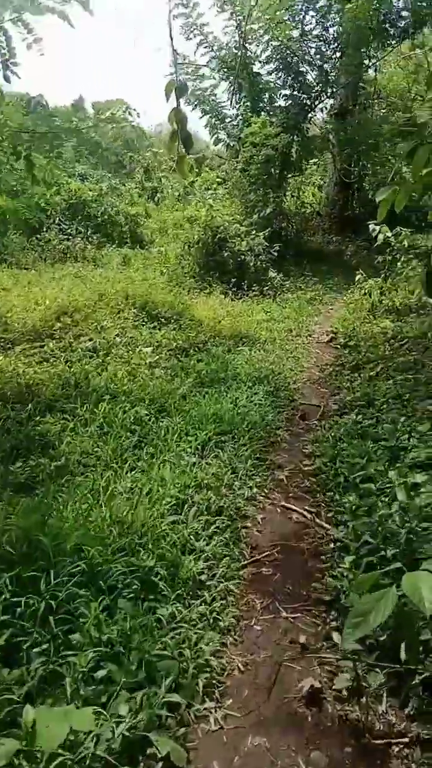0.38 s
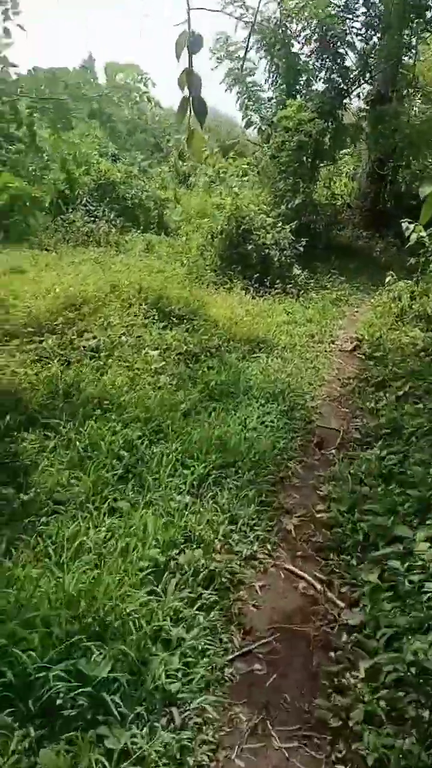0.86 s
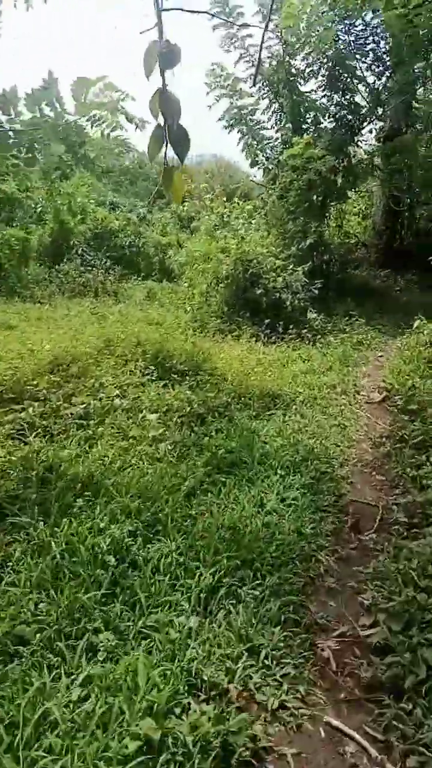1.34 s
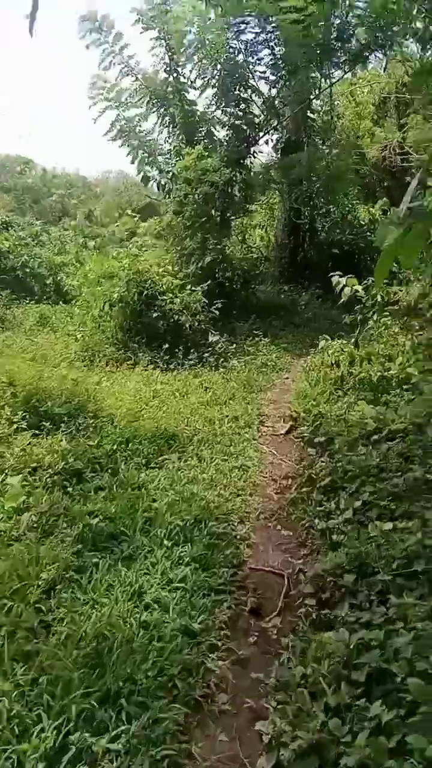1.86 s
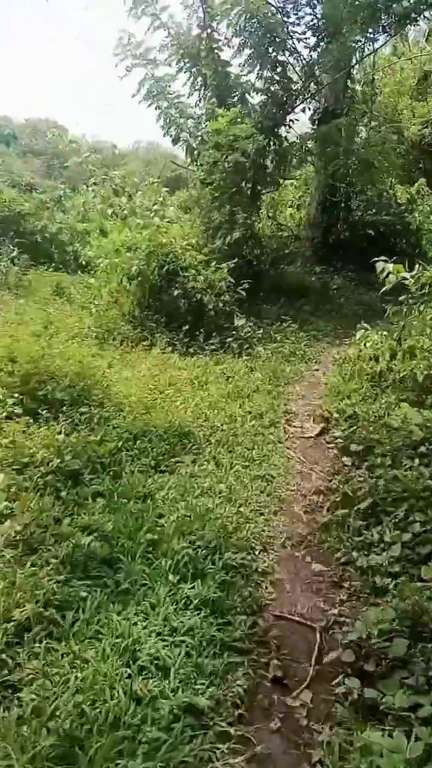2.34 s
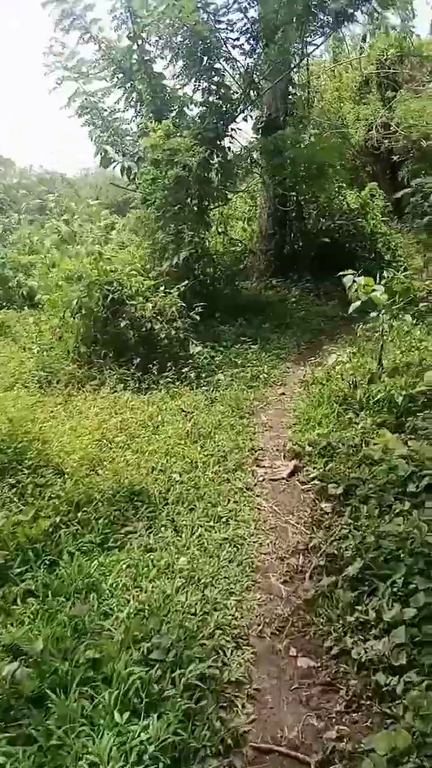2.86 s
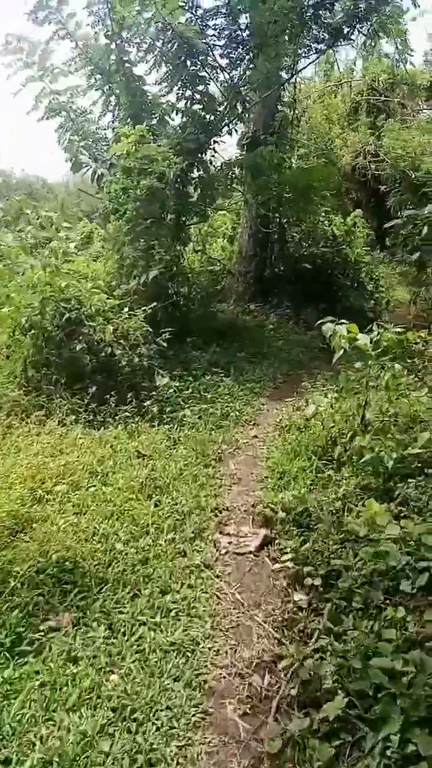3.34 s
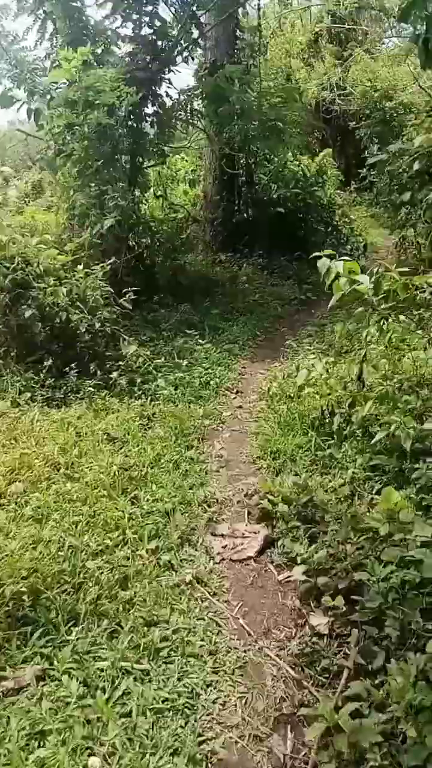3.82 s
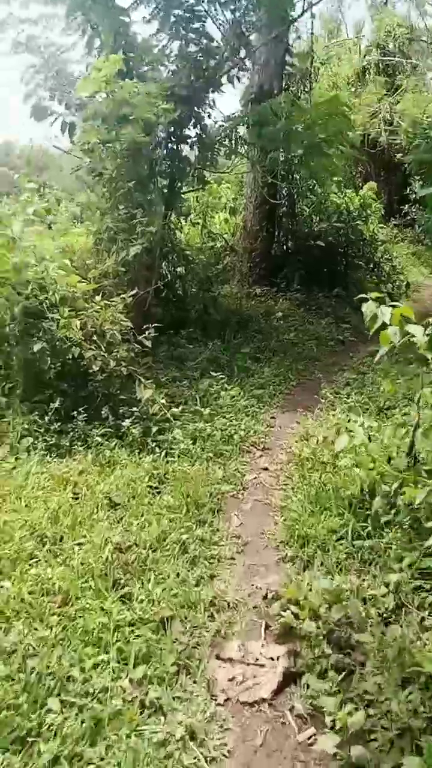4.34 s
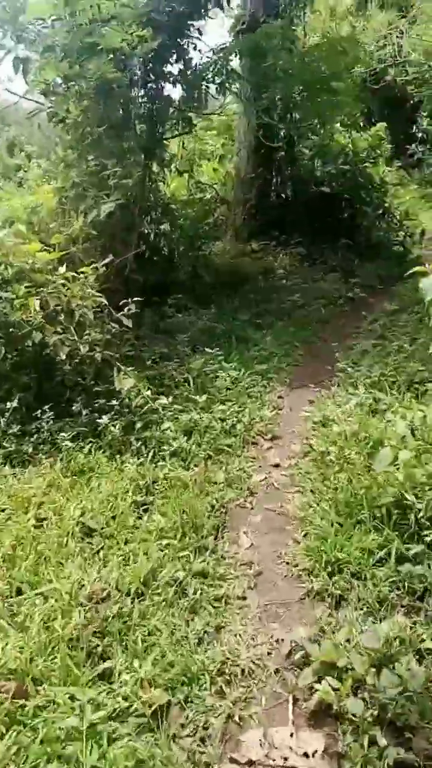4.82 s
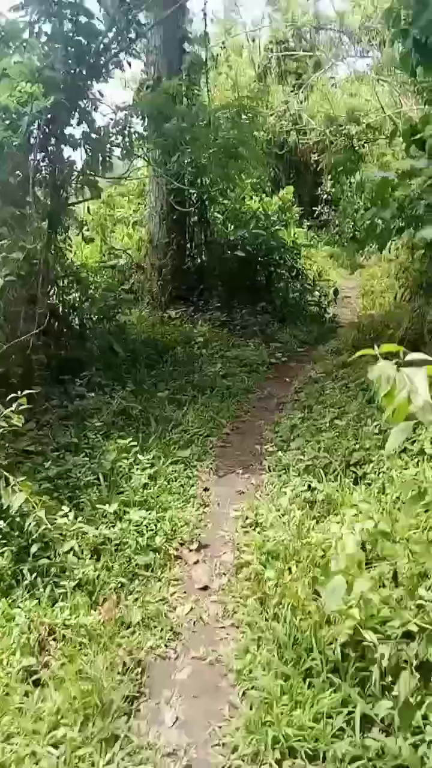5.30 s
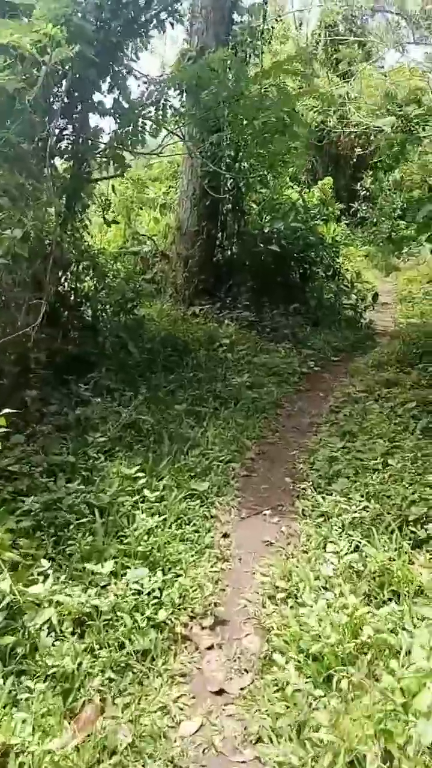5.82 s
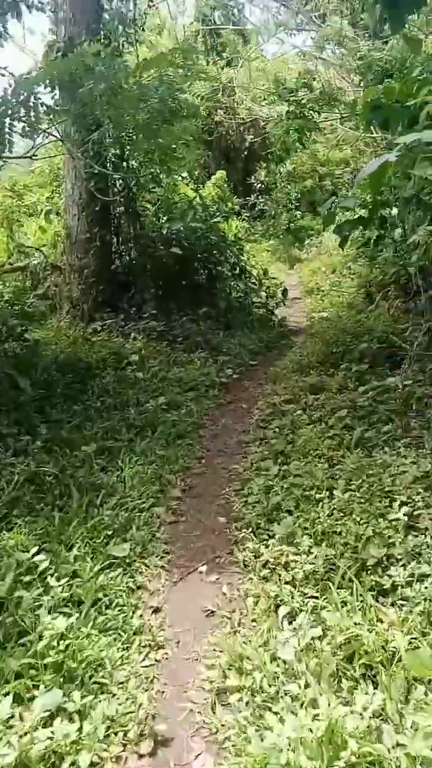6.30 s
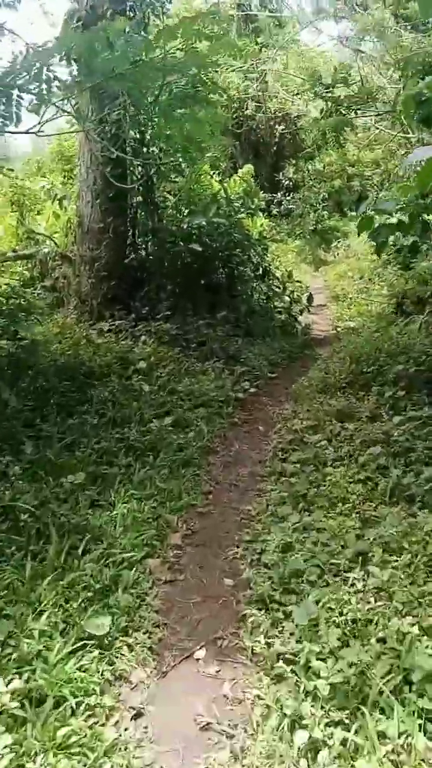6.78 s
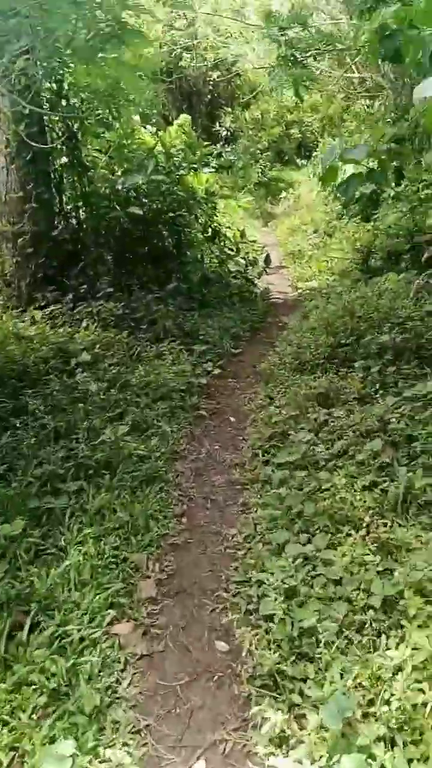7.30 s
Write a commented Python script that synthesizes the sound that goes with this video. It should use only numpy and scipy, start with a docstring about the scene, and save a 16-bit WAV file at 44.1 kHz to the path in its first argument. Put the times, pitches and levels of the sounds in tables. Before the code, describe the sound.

Outdoors on a path under trees, a steady high insect buzz runs throughout. A far bird's trill fades at the start, then clear whistles echo through the wood. Grass swishes with strides and twigs snap softly. Wind thumps the handheld microphone. Around two and a half seconds the wide stereo abruptly narrows to mono; later a nearer bird sings faster, brighter phrases.

```python
"""A steady insect band under trees, with a far trill washing through it: noise in a band and falling sine sweeps.
Along a dirt path, far birds and one near songbird whistle as gliding sines into the echo of the wood.
Grains of noise are legs in the grass, ringing clicks are twigs; wind thumps the microphone as bass noise and
short low swings. At one moment the stereo picture folds to mono and the echoes of before are cut off."""
import sys
import numpy as np
from scipy import signal
from scipy.fft import rfft, irfft
from scipy.io import wavfile
from scipy.ndimage import uniform_filter1d, map_coordinates

SR = 44100
rng = np.random.default_rng(int(sys.argv[2]) if len(sys.argv) > 2 else 0)


def wav_out(sig):
    """Save sig, one row per channel (or a flat mono array), as 16-bit PCM at SR to the path in sys.argv[1]."""
    wavfile.write(sys.argv[1], SR, np.round(np.clip(np.atleast_2d(sig).T, -1, 1) * 32767).astype(np.int16))


def field_ratio(decibels):
    """Amplitude ratio for a level in dB (20 dB per decade); scalars and array-likes work."""
    return 10 ** (np.asarray(decibels, dtype=float) / 20)


N = 337806
FOLD_S = 2.578  # mono from here on
LEAD = SR // 2  # samples of birdsong ahead of the start, so that echoes are already ringing


def unit(x):
    """Scaled to rms 1."""
    return x / np.sqrt(np.mean(x ** 2) + 1e-20)


def along(points, hz):
    """Interpolates (Hz, value) points on a log frequency axis."""
    f, v = np.transpose(points)
    return np.interp(np.log(hz + 1), np.log(f + 1), v)


def curves(rows):
    """One value per sample for each column after the time."""
    s, *cols = np.transpose(rows)
    return [np.interp(np.arange(N) / SR, s, c) for c in cols]


def wobble(rate):
    """A smooth random curve, rate knots a second."""
    coarse = map_coordinates(rng.standard_normal(SR // 8), [np.arange(0, N + 16, 16) * rate / SR])
    return np.interp(np.arange(N) / 16, np.arange(len(coarse)), coarse)


def stereo(mid, side, alike):
    """Left and right with mid rms 1; alike is the correlation between them."""
    side = side * np.tan(np.arccos(np.clip(alike, 0, 1)) / 2)
    return np.array([mid + side, mid - side]) / np.std(mid)


def rush(spectrum, alike, patchy_db):
    """Stereo noise with patches of random gain in time and frequency."""
    hz, _, z = signal.stft(rng.standard_normal((2, N + 1024)), SR, nperseg=1024)
    field = uniform_filter1d(rng.standard_normal(z.shape[1:]), size=9, axis=0)
    field = uniform_filter1d(field, size=5, axis=1)
    gain = field_ratio(along(spectrum, hz)[:, None] + patchy_db * unit(field))
    mid, side = signal.istft(z * gain, nperseg=1024)[1][:, :N]
    return stereo(mid, side, alike)


def low(spectrum, alike):
    """Stereo bass noise, shaped finely over the whole length."""
    hz = np.fft.rfftfreq(N, 1 / SR)
    mid, side = irfft(rfft(rng.standard_normal((2, N))) * field_ratio(along(spectrum, hz)), N)
    return stereo(mid, side, alike)


def width():
    """1 while the picture is wide, falling to 0 in the last moment before the fold."""
    return np.clip((FOLD_S - np.arange(N) / SR) / .02, 0, 1)


# Loudness of the insect chorus. Each row: time in seconds, level in dB.
CHORUS_LEVEL = [(0, -54.5), (3.7, -52.5), (7.66, -53.5)]
# Its band. Each row: frequency in Hz, relative density in dB per Hz.
CHORUS_SPECTRUM = [(4800, -58), (5900, -10.5), (6600, -1), (7600, -4), (9100, 1), (9900, -8.5),
                   (10800, -21), (12000, -32)]


def insects():
    """A chorus of many, blurred to a band with a fine fast shimmer."""
    level_db, = curves(CHORUS_LEVEL)
    shimmer_db = 0.41 * wobble(250)
    return field_ratio(level_db + shimmer_db) * rush(CHORUS_SPECTRUM, alike=1.0, patchy_db=2.0)


# Far leaves and open air, apart from the dip. Each row: time in seconds, level in dB.
AIR_LEVEL = [(0, -58.5), (2.57, -58.5), (3.05, -64), (5, -62.5), (7.66, -63.5)]
# Their hush. Each row: frequency in Hz, relative density in dB per Hz.
AIR_SPECTRUM = [(30, 4.5), (150, 6.5), (400, 2.5), (1000, -2.5), (3000, -4.5), (5000, -9.5), (11000, -22),
                (16000, -17.5)]


def air():
    """Far leaves and open air are a broad hush, whose level dips for a while after the fold."""
    t = np.arange(N) / SR
    dip_end_s, dip_db = 3.03, -16
    dip = np.clip(np.minimum(t - FOLD_S, dip_end_s - t) / 0.0093, 0, 1)
    return field_ratio(curves(AIR_LEVEL)[0] + dip_db * dip) * rush(AIR_SPECTRUM, alike=0.42, patchy_db=3.0)


# Gusts on the microphone ports. Each row: start of the hold in seconds, hold in seconds, thump level in dB.
GUST_TIMES = [(1.316, 0.067, -56.5), (1.49, 0.097, -44), (1.804, 0.011, -38.5), (1.896, 0.019, -42),
              (2.44, 0.15, -39), (2.606, 0.033, -39), (3.96, 0.15, -45.5), (4.348, 0.25, -45),
              (4.892, 0.41, -48), (6.215, 0.029, -36), (6.23, .1, -39.5), (6.411, 0.15, -43.5),
              (6.621, 0.071, -41.5), (7.445, 0.16, -55)]
# Breeze between gusts, about which the level wanders. Each row: time in seconds, thump level in dB.
BREEZE_LEVEL = [(0, -64.5), (1.3, -61), (2.3, -47.5), (3.2, -53), (3.4, -75.5), (4.2, -56.5), (5.2, -55),
                (5.7, -78.5), (7.66, -92)]


def gusts():
    """Thump level in dB: the breeze, and over it each gust's rise, hold and fall."""
    s, hold, db = np.transpose(GUST_TIMES)
    rise_db_per_s, fall_db_per_s = 600, 453
    t = np.arange(0, N / SR + .01, .002)[:, None]
    rise = rise_db_per_s * np.maximum(s - t, 0)
    fall = fall_db_per_s * np.maximum(t - s - hold, 0)
    gust_db = np.interp(np.arange(N) / SR, t[:, 0], (db - rise - fall).max(axis=1))
    breeze_db = curves(BREEZE_LEVEL)[0] + 6 * np.tanh(wobble(15))
    return np.maximum(gust_db, breeze_db)


# Lowest rumble at the microphone while the picture is wide. Each row: time in seconds, level in dB.
DEEP_LEVEL = [(0, -54), (2.33, -49), (2.38, -39.5), (2.48, -36), (2.55, -34)]
# Spectra of that rumble, of the thumps and of hard gusts.
# Each row: frequency in Hz, relative density in dB per Hz.
RUMBLE_SPECTRUM = [(10, -14), (32, -4.5), (55, -3.5), (90, -18.5), (200, -80)]
THUMP_SPECTRUM = [(30, -62), (70, 0.5), (130, 1.5), (220, -19), (400, -55), (800, -51)]
SLAP_SPECTRUM = [(120, 16), (260, 7), (600, -36)]


def wind():
    """Gusts on the ports: lumpy thumps, brighter when hard, over a deep rumble."""
    thump_db, wide = gusts(), width()
    lumps = unit(field_ratio(3.9 * wobble(24))) * field_ratio(-6.5 * wide)
    slap_db = 1.57 * thump_db + 17.0 + 0.83 * wide  # grows faster than the thump
    thumps = field_ratio(thump_db) * low(THUMP_SPECTRUM, alike=0.84) + field_ratio(slap_db) * low(SLAP_SPECTRUM, alike=0.57)
    # once mono, the rumble follows the gusts from 22 dB under them
    deep_db = wide * curves(DEEP_LEVEL)[0] + (1 - wide) * (thump_db - 22)
    rumble = unit(field_ratio(wobble(2.59)) * low(RUMBLE_SPECTRUM, alike=0.66))
    lean = field_ratio([[1.5], [-1.5]])  # towards the left
    return field_ratio(deep_db) * rumble * lean + lumps * thumps


def add(line, rows, flutter_db=2.5, waver_share=0.0083, edge_s=0.0012, knots_per_s=130):
    """One note: a slightly unsteady sine on its pitch line, a weak octave, soft ends, a flutter in level."""
    s, hz, db = np.transpose(rows)
    t = np.arange(s[0], s[-1], 1 / SR)
    knots = rng.standard_normal(size=(2, 100))
    waver, flutter = [map_coordinates(k, [(t - s[0]) * knots_per_s]) for k in knots]
    phase = 2 * np.pi * np.cumsum(np.interp(t, s, hz) * (1 + waver_share * waver)) / SR
    edge = np.clip(np.minimum(t - s[0], s[-1] - t) / edge_s, 0, 1)
    level = np.sqrt(2) * field_ratio(np.interp(t, s, db) + flutter_db * flutter) * edge
    line[LEAD + round(s[0] * SR):][:len(t)] += level * (np.sin(phase) + field_ratio(-35.0) * np.sin(2 * phase))


def shaped(s, length, hz, db, rise, start_db, end_db):
    """Rows of one note from its pitch as a function of the share sung; the level swells, then sinks."""
    u = np.linspace(0, 1, num=13)
    level_db = db + np.interp(u, [0, rise, 1], [start_db, 0, end_db])
    return np.transpose([s + u * length, hz(u), level_db])


# One falling sweep of the far trill. Each row: seconds after its start, pitch in Hz, level in dB.
TRILL_SWEEP = [(0, 5800, -58.5), (.01, 5300, -47), (.028, 4000, -50), (.05, 3000, -58)]


def far_trill():
    """A far bird repeats one falling sweep, dry; the gaps grow as it tires."""
    trill = np.zeros(N + LEAD)
    k = np.arange(13)
    first_s, period_s, slows_s = -.418, .072, .0005
    for s in first_s + period_s * k + slows_s * k ** 2:
        add(trill, np.add(TRILL_SWEEP, [s, 0, 0]), flutter_db=0.5, waver_share=0.0026)
    return trill


# Clean whistles, mostly far, some short and loud, easing from one pitch to another.
# Each row: start in seconds, length in seconds, first pitch in Hz, last pitch in Hz, top level in dB.
CLEAN_WHISTLES = [(0.588, 0.06, 2230, 2227, -54), (0.727, 0.14, 5120, 5000, -42.5),
                  (1.409, 0.097, 2620, 2814, -57), (1.21, 0.22, 2840, 2834, -54),
                  (1.318, 0.49, 3000, 2950, -63.5), (1.584, 0.09, 3540, 3250, -57.5),
                  (1.722, .085, 4450, 4550, -70.5), (0.902, 0.18, 2863, 2328, -50.5),
                  (1.607, 0.094, 1490, 1572, -54.5), (1.829, 0.11, 2440, 2492, -48),
                  (1.933, .14, 2546, 2540, -41), (2.069, 0.14, 2513, 2570, -52.5),
                  (2.355, 0.18, 2045, 2230, -51.5), (3.024, 0.11, 2705, 2520, -56),
                  (3.251, 0.14, 1853, 1936, -58.5), (3.275, 0.33, 3430, 3303, -49.5),
                  (3.384, 0.29, 3890, 3760, -57), (3.49, 0.15, 459.5, 468.5, -66.5),
                  (4.315, 0.4, 1616, 2410, -58), (4.789, 0.088, 2560, 2570, -64.5),
                  (4.914, 0.11, 3540, 3560, -67), (5.235, 0.097, 2995, 2910, -64),
                  (5.188, .11, 2750, 2690, -68.5), (2.491, 0.053, 3160, 3230, -55.5),
                  (5.833, 0.09, 3259, 3483, -33.5), (5.894, 0.052, 3700, 3348, -33),
                  (5.995, 0.069, 3253, 3223, -36.5), (6.061, 0.19, 3235, 3380, -49),
                  (6.034, 0.1, 3690, 3466, -51), (6.07, 0.14, 474.4, 472, -66),
                  (6.139, 0.14, 3700, 3640, -44)]
# Whistles that arch over a top. Each row: start in seconds, length in seconds, first pitch in Hz,
# top pitch in Hz, last pitch in Hz, top level in dB, share of the length before the top pitch.
ARCHED_WHISTLES = [(0.692, 0.3, 1740, 2097, 1708, -53, 0.33), (1.183, 0.23, 2408, 2680, 2410, -52, 0.512)]
# A rising call before stretching. Each row: seconds after its start, pitch in Hz, level in dB.
RISING_CALL = [(0, 2750, -66), (.04, 2950, -48), (.053, 3205, -43), (.142, 3690, -40)]
# When it is given. Each row: start in seconds, stretch of its length as a factor.
RISING_CALL_STARTS = [(0.159, 1), (0.471, 1.17)]


def clean_whistles():
    """Clean whistles, mostly far, and the rising call, dry: sines with little waver on smooth pitch lines."""
    line = np.zeros(N + LEAD)
    for s, length, a, b, db in CLEAN_WHISTLES:
        ease = lambda u: b + (a - b) * (1 - u) ** 1.8  # arrives early at the last pitch
        rows = shaped(s, length, ease, db, rise=0.53, start_db=-3, end_db=-4)
        add(line, rows, flutter_db=2.5, waver_share=0.0031, edge_s=0.0097)
    for s, length, a, top, b, db, share in ARCHED_WHISTLES:
        def arch(u):
            bend = np.where(u < share, (a - top) / share ** 2, (b - top) / (1 - share) ** 2)
            return top + bend * (u - share) ** 2
        rows = shaped(s, length, arch, db, rise=0.53, start_db=-3, end_db=-7.5)
        add(line, rows, flutter_db=1.0, waver_share=0.0019)
    for s, stretch in RISING_CALL_STARTS:
        rows = np.multiply(RISING_CALL, [stretch, stretch ** 0.19, 1]) + [s, 0, 0]  # the longer, the higher
        add(line, rows, flutter_db=2.0, waver_share=0.0009)
    return line


# Twig and leaf ticks. Each row: start in seconds, knock level in dB, crack level in dB, knock pitch in Hz.
TWIG_TICKS = [(0.537, -38.5, -51, 2043), (0.869, -31, -20, 3130), (2.365, -42.5, -39.5, 1950),
              (2.491, -19.5, -60, 953), (2.556, -40.5, -60, 925), (3.652, -39, -57, 2640),
              (3.66, -39, -59, 2520), (3.837, -38, -38, 1520), (3.896, -34, -21.5, 1940),
              (3.93, -25.5, -37, 2700), (3.982, -46, -27, 2190), (4.017, -39, -67, 653),
              (4.789, -37.5, -67, 2400), (4.819, -39, -66, 2670), (4.853, -46, -54, 1270),
              (5.001, -42.5, -60, 1650), (5.156, -44.5, -61, 1680), (5.764, -60, -28.5, 1500),
              (6.247, -48, -24, 2200), (7.161, -37.5, -41, 2360), (7.381, -49, -48, 1590)]


def ticks():
    """Each tick: a short woody knock with a wide resonance and a bright crack of a millisecond."""
    out, t = np.zeros((2, N + SR)), np.arange(SR // 25) / SR
    bright = signal.butter(2, 5000, "high", fs=SR)
    for s, db, crack_db, hz in TWIG_TICKS:
        crack, snap = rng.standard_normal((2, len(t)))
        crack = signal.lfilter(*bright, crack * field_ratio(-60 * t / 0.006))
        woody = signal.butter(2, [0.65 * hz, 2.1 * hz], "band", fs=SR)
        snap = signal.lfilter(*woody, snap * field_ratio(-60 * t / 0.021))
        knock = np.sin(2 * np.pi * hz * t) * field_ratio(-60 * t * hz / 18) + 1.6 * snap
        lean = field_ratio([[2.5], [-4]] if s < FOLD_S else 0)  # knocks sit to the left until the fold
        out[:, round(s * SR):][:, :len(t)] += field_ratio(crack_db) * crack + field_ratio(db) * knock * lean
    return out[:, :N]


# Far sweeps, heard only as a wash.
# Each row: start in seconds, length in seconds, first pitch in Hz, last pitch in Hz, level in dB before the wash.
WASHED_SWEEPS = [(0.609, 0.059, 7970, 6610, -53.5), (2.195, 0.14, 3136, 2380, -62.5)]


def wash(trill, leaves):
    """Trill and far sweeps as scatter: noise that builds and fades blurs them, moving leaves smear their pitch."""
    far = trill.copy()
    for s, length, a, b, db in WASHED_SWEEPS:
        add(far, [(s, a, db), (s + length, b, db)])
    t = np.arange(SR // 2) / SR / .07  # in units of the fade, 0.07 s
    blur = rng.standard_normal(len(t)) * np.sqrt(t) * np.exp(-t)
    smeared = signal.fftconvolve(far * leaves[::-1], blur / np.linalg.norm(blur))[:N + LEAD]
    return field_ratio(4.5) * (1 + leaves) * smeared


# Legs in the grass. Each row: time of the peak in seconds, half length in seconds (at least 0.01 is played),
# swish level in dB, body level in dB.
STRIDES = [(0.764, 0.078, -74, -63), (0.88, 0.081, -46, -51.5), (1.052, 0.079, -56.5, -61.5),
           (1.615, 0.058, -61, -63), (2.05, 0.08, -59.5, -83), (2.359, 0.021, -57, -48.5),
           (2.832, 0.032, -53.5, -59.5), (3.195, 0.13, -49, -58.5), (3.746, 0.098, -53.5, -67),
           (3.934, 0.096, -46, -53.5), (4.438, 0.089, -46.5, -53), (4.827, 0.056, -90, -59),
           (5.482, 0.033, -49, -56), (5.606, 0.063, -49, -57.5), (5.76, 0.057, -45, -58),
           (6.145, 0.04, -45, -57.5), (6.513, 0.031, -47.5, -47.5), (6.722, 0.11, -48, -57.5),
           (7.369, 0.091, -40, -50), (7.51, 0.048, -78, -57)]
# Spectra of grass blades and of stems. Each row: frequency in Hz, relative density in dB per Hz.
BLADE_SPECTRUM = [(2000, -58), (4000, 10), (9000, 11.5), (11000, 6), (13000, 0.5), (15000, 14), (16500, 10)]
STEM_SPECTRUM = [(300, -28), (700, -7.5), (1100, -1), (2500, -2), (5000, -6.5), (8000, -26)]


def legs():
    """Each stride swells and fades; grass blades hiss in clumped grains, stems rub lower down."""
    s, half_s, swish_db, body_db = np.transpose(STRIDES)
    t = np.arange(0, N / SR + .01, .002)
    stride = np.exp(-((t[:, None] - s) / np.maximum(half_s, .01)) ** 2)
    swish, body = [np.interp(np.arange(N) / SR, t, stride @ field_ratio(db)) for db in (swish_db, body_db)]
    grain = wobble(500) + 0.92 * wobble(45)
    blades = swish * field_ratio(2.0 * grain) * rush(BLADE_SPECTRUM, alike=1.0, patchy_db=3.5)
    stems = body * field_ratio(1.54 * grain) * rush(STEM_SPECTRUM, alike=0.99, patchy_db=5.5)
    return blades + stems


# Quick slides of the birds, near and far.
# Each row: start in seconds, length in seconds, first pitch in Hz, last pitch in Hz, top level in dB.
QUICK_SLIDES = [(0.773, 0.033, 5070, 4100, -47), (1.58, 0.029, 1690, 2000, -54.5),
                (2.217, 0.04, 2330, 2630, -49.5), (2.256, 0.057, 2320, 2100, -47.5),
                (2.329, 0.019, 2038, 2067, -41), (3.682, 0.025, 8030, 7300, -41),
                (3.696, 0.009, 7300, 6570, -37.5), (3.676, 0.015, 7200, 5660, -49),
                (3.707, 0.008, 6050, 6080, -40), (3.768, 0.014, 5700, 5620, -41),
                (3.786, 0.0212, 6970, 6520, -34.5), (3.807, 0.012, 7170, 6590, -34),
                (4.897, 0.023, 4010, 3610, -60), (5.462, 0.024, 3710, 2730, -50.5),
                (5.566, 0.014, 3830, 4510, -47), (5.584, 0.019, 5590, 4770, -54),
                (5.599, 0.021, 4780, 4810, -43), (5.624, 0.023, 4740, 3530, -41.5),
                (5.722, 0.011, 3280, 4590, -40), (5.732, 0.014, 4690, 3890, -30),
                (5.755, 0.024, 3804, 3755, -29), (5.769, 0.0059, 3730, 3200, -49),
                (5.8, 0.02, 3700, 3870, -51), (6.402, 0.015, 8180, 8080, -40),
                (6.441, 0.023, 8390, 7950, -37), (6.603, 0.009, 8800, 8000, -43.5),
                (6.712, 0.033, 8440, 8280, -38.5), (6.796, 0.017, 7930, 9030, -36.5),
                (6.917, 0.0096, 8030, 6400, -32), (7.064, 0.028, 7200, 6730, -33),
                (7.275, 0.0093, 4580, 3670, -32), (7.287, 0.033, 3530, 3727, -44),
                (7.372, 0.049, 4120, 3980, -43.5)]
# Hooks, which bend towards one pitch and leave it again. Each row: start in seconds, length in seconds,
# first pitch in Hz, turning pitch in Hz, last pitch in Hz, top level in dB.
QUICK_HOOKS = [(3.132, 0.036, 3114, 3733, 3590, -40), (3.195, 0.1, 3380, 3576, 3330, -45.5),
               (3.715, 0.028, 6590, 6510, 7200, -34.5), (3.741, 0.036, 7200, 7410, 6800, -34),
               (3.741, 0.021, 5900, 5500, 5550, -43), (6.369, 0.04, 7660, 7760, 6760, -34),
               (6.411, 0.029, 7710, 7940, 7300, -31), (6.529, 0.035, 8020, 7940, 8540, -33),
               (6.614, 0.052, 7750, 6715, 7800, -24.5), (6.653, 0.028, 7100, 7030, 6760, -31),
               (6.749, 0.047, 7960, 7490, 7720, -25), (6.887, 0.023, 8080, 7514, 7730, -27),
               (6.963, 0.048, 7950, 6170, 6260, -25.5), (7.175, 0.069, 4147, 4274, 4230, -30.5),
               (7.248, 0.023, 4340, 4680, 4360, -36.5), (7.347, 0.029, 4860, 4300, 4310, -26.5)]
# Buzzy notes. Each row: start in seconds, length in seconds, first pitch in Hz, last pitch in Hz, level in dB.
BUZZY_NOTES = [(3.777, .05, 5350, 5200, -48)]
# Dives that fall in uneven steps, one list for each dive.
# Each row: time in seconds, pitch in Hz, level in dB.
UNEVEN_DIVES = [
    [(3.04, 6080, -38), (3.052, 5530, -47), (3.062, 4250, -36), (3.09, 3790, -44.5), (3.13, 2910, -47)],
    [(4.03, 4450, -45), (4.09, 4290, -37), (4.15, 3800, -37.5), (4.158, 3200, -42), (4.18, 3040, -47.5),
     (4.19, 2740, -60), (4.21, 2580, -36)],
    [(7.09, 6090, -29), (7.099, 4600, -37.5), (7.114, 4390, -22.5), (7.126, 3120, -41.5)],
]


def quick_notes():
    """Slides of birds near and far, hooks, buzzy notes and dives, dry: sines, the buzzy ones shaken fast in pitch."""
    song = np.zeros(N + LEAD)
    quick = dict(rise=0.64, start_db=-6.5, end_db=-4.5)
    for s, length, a, b, db in QUICK_SLIDES:
        add(song, shaped(s, length, lambda u: a + (b - a) * u, db, **quick))
    share, power = 0.471, 2.08  # share of a hook before its turn, how round the turn is
    for s, length, a, turn, b, db in QUICK_HOOKS:
        def hook(u):
            bend = np.where(u < share, (a - turn) / share ** power, (b - turn) / (1 - share) ** power)
            return turn + bend * abs(u - share) ** power
        add(song, shaped(s, length, hook, db, **quick))
    for s, length, a, b, db in BUZZY_NOTES:
        add(song, [(s, a, db), (s + length, b, db)], flutter_db=4.0, waver_share=.045, knots_per_s=450)
    for dive in UNEVEN_DIVES:
        add(song, dive, flutter_db=4.5, waver_share=0.015)
    return song


# The wood's echo. Each row: frequency in Hz, time in seconds to fall by 60 dB.
WOOD_DECAY = [(500, 1.66), (3500, 0.95), (7500, 0.42), (14000, 0.27)]


def echo(x, close_db):
    """The trees scatter: close leaves blur the note, the wood adds a long tail, cut off where the picture folds."""
    hz, t, z = signal.stft(rng.standard_normal((2, SR)), SR, nperseg=256)
    decay = field_ratio(-60 * t / along(WOOD_DECAY, hz)[:, None]) + field_ratio(close_db - 60 * t / 0.074)
    tail = signal.istft(z * decay, SR, nperseg=256)[1]
    tail = tail / np.linalg.norm(tail[0])
    cut = LEAD + round(FOLD_S * SR)
    before = signal.fftconvolve(x[None, :cut], tail, axes=1)[:, LEAD:cut]
    after = signal.fftconvolve(x[cut:], tail[0])[:len(x) - cut]
    mid, side = before.mean(axis=0), 0.77 * (before[0] - before[1]) / 2
    before = field_ratio(-1.0) * np.array([mid + side, mid - side])
    return np.hstack([before, field_ratio(-3.5) * np.array([after, after])])


def birds():
    """All notes, heard directly and through the wood; the far trill arrives mostly as a wash."""
    trill, clean, quick = far_trill(), clean_whistles(), quick_notes()
    leaves = np.resize(wobble(400), N + LEAD)  # moving leaves smear the pitch of what they scatter
    direct = quick + clean + trill + wash(trill, leaves)
    scattered = echo((1 + 1.05 * leaves) * (quick + trill / 2), close_db=10.0)
    scattered = scattered + echo((1 + 0.82 * leaves) * field_ratio(-2.0) * clean, close_db=4.5)
    return direct[LEAD:] + scattered


# Single hard thumps on the microphone ports. Each row: time of the middle in seconds, level in dB of the low swing.
HARD_THUMPS = [(2.541, -25.5), (2.748, -30.5), (2.901, -37.5), (4.413, -31.5), (4.465, -32), (4.538, -37.5),
               (4.671, -32.5), (4.758, -33), (4.891, -35), (4.989, -36), (5.051, -34.5), (5.135, -32.5),
               (5.248, -39), (5.958, -41.5), (6.273, -21), (6.342, -28), (6.536, -27), (6.67, -24)]


def bumps():
    """Each thump is a cycle or two of a low swing; the harder, the more edge it has."""
    out, t = np.zeros(N), np.arange(-2000, 2000) / SR
    half_s, swing_hz, edge_hz = 0.005, 136.5, 322
    draws = rng.standard_normal((len(HARD_THUMPS), 2))
    for (s, db), (scatter, turn) in zip(HARD_THUMPS, draws):
        phase = 2 * np.pi * swing_hz * np.exp(0.21 * scatter) * t + turn  # pitch differs from thump to thump
        swing = field_ratio(db) * np.sin(phase) * np.exp(-(t / half_s) ** 2)
        edge = field_ratio(2.1 * db + 12.5) * np.sin(2 * np.pi * edge_hz * t + turn) * np.exp(-(2 * t / half_s) ** 2)
        out[round(s * SR) - 2000:][:len(t)] += swing + edge
    return out


def scene():
    """Everything at the two microphone ports."""
    return insects() + air() + wind() + birds() + ticks() + legs() + bumps()


def roll_off(x):
    """The treble ends steeply here."""
    return signal.sosfilt(signal.butter(12, 17000, fs=SR, output="sos"), x)


def record(dry):
    """Nothing above the band limit of 15830 Hz; stereo first, then both sides carry the same mix."""
    dry = irfft(rfft(dry) * (np.fft.rfftfreq(N, 1 / SR) < 15830), N)
    mid = dry.mean(axis=0)
    mix = mid + width() * (dry - mid)
    return roll_off(mix)


dry = scene()
out = record(dry)
wav_out(out)
```